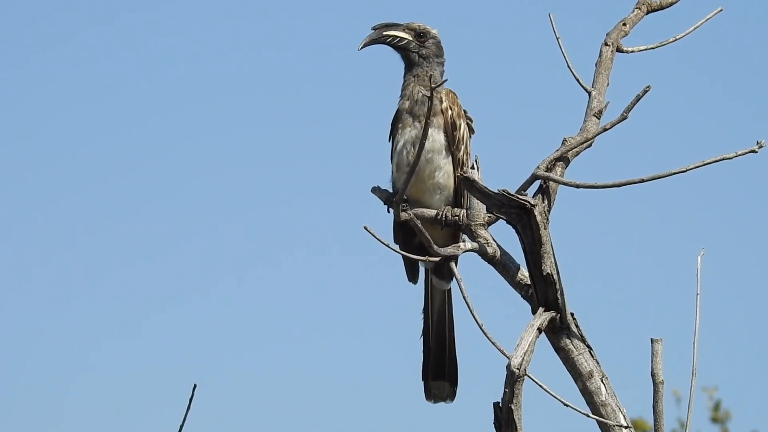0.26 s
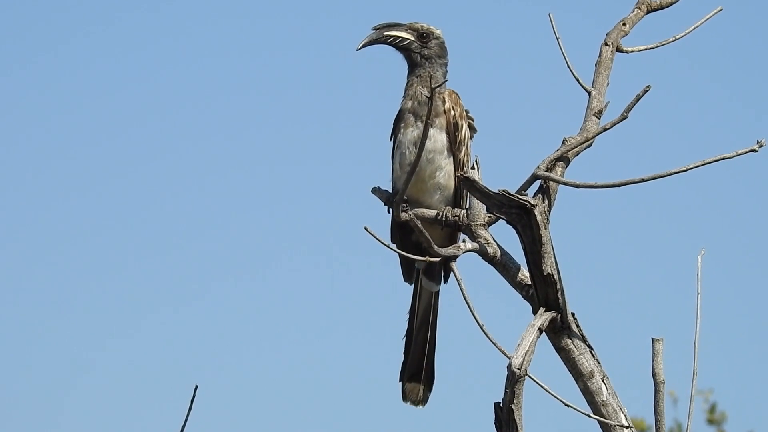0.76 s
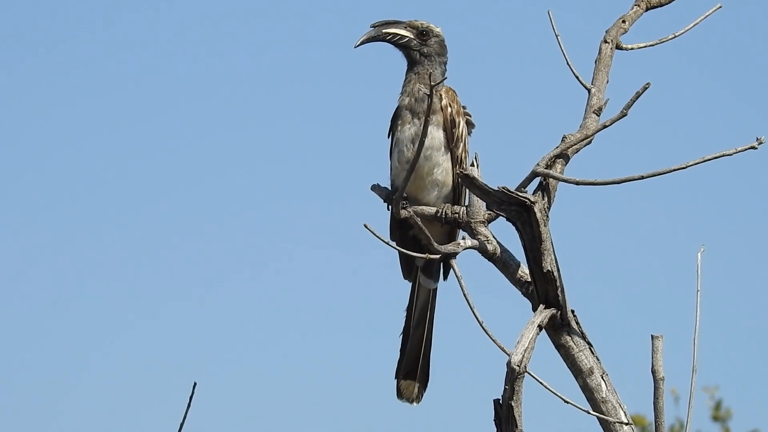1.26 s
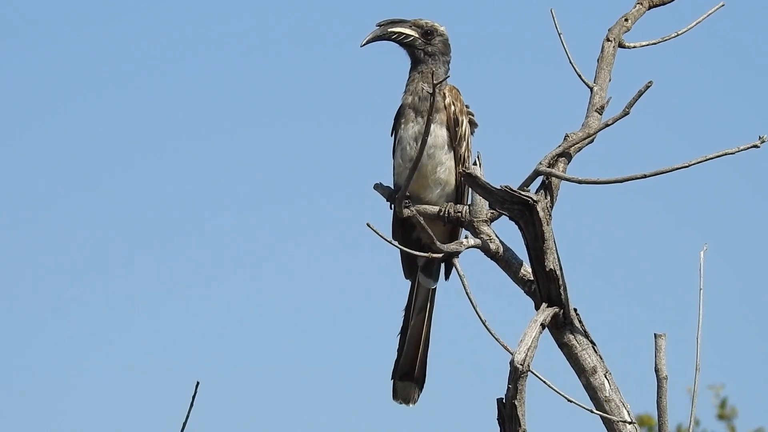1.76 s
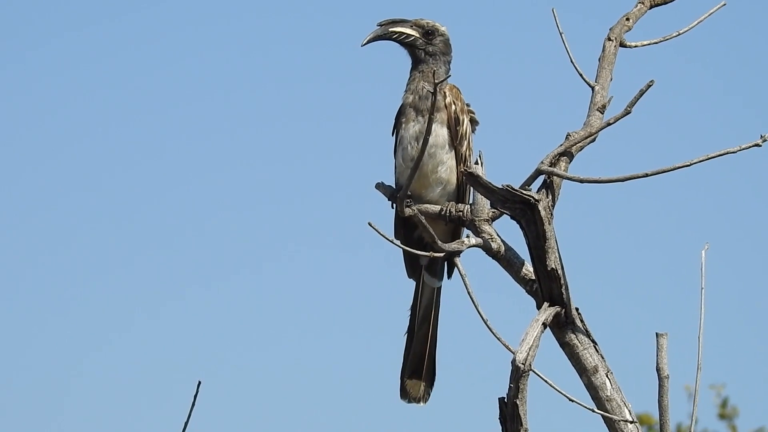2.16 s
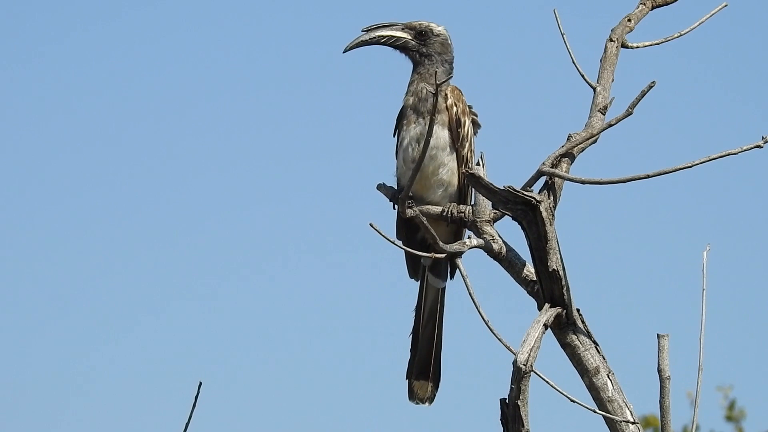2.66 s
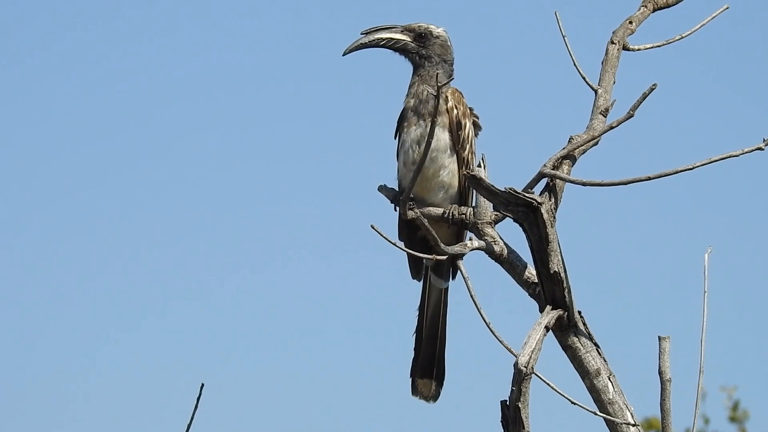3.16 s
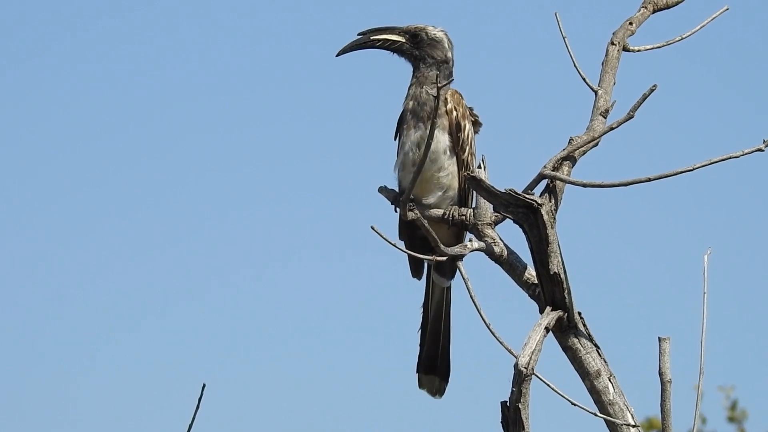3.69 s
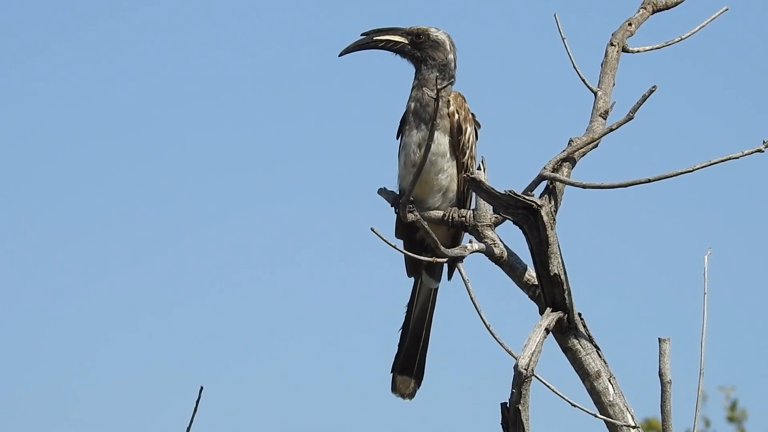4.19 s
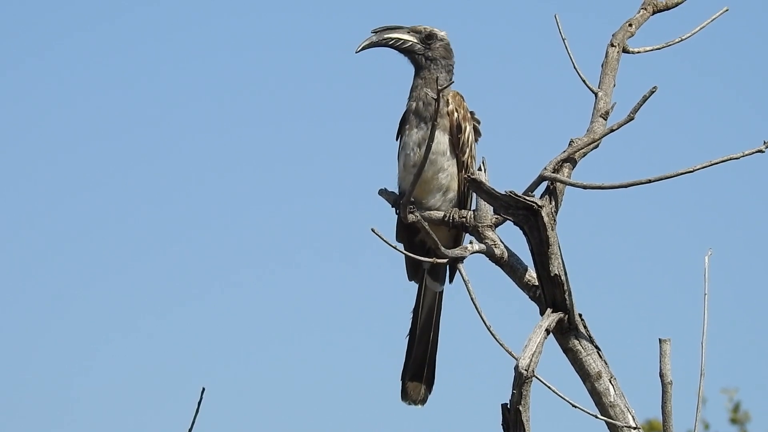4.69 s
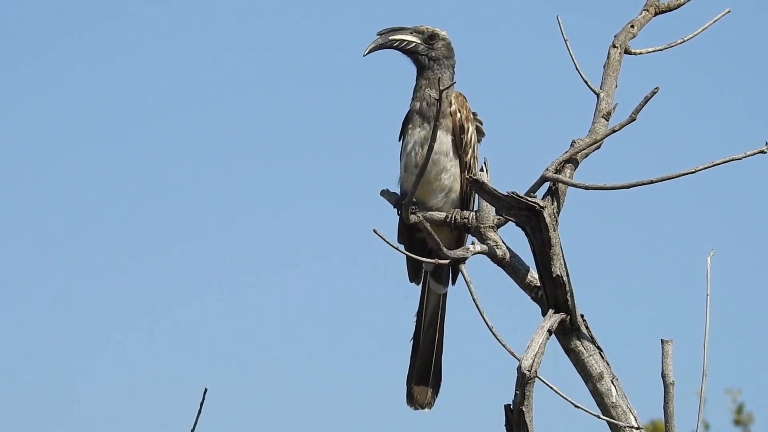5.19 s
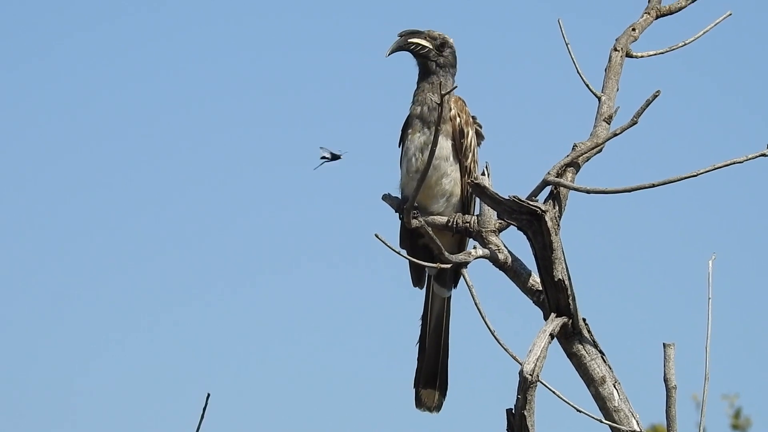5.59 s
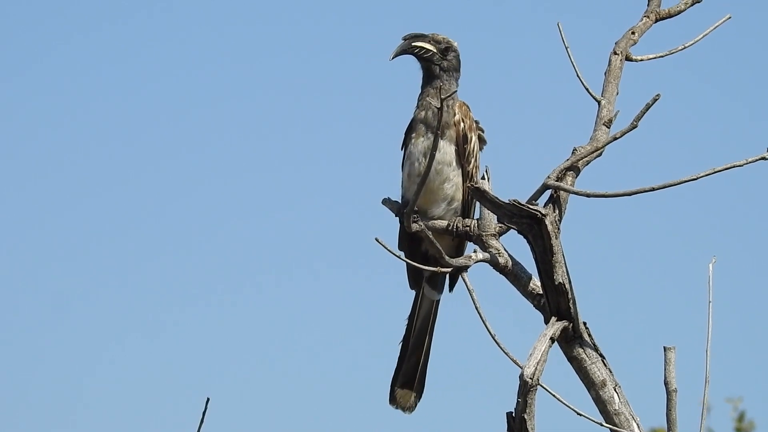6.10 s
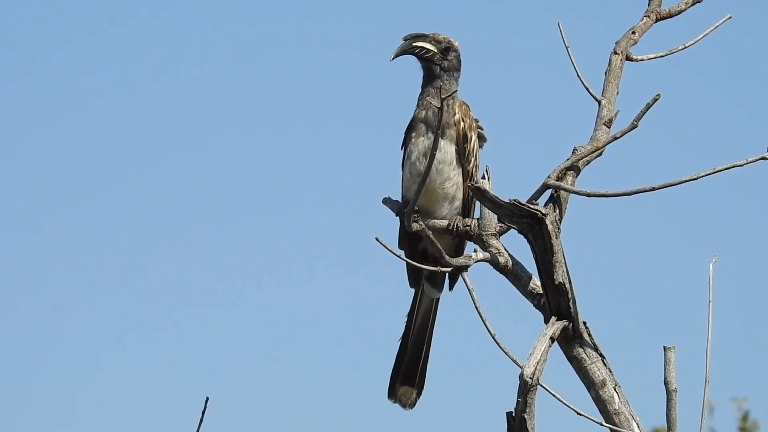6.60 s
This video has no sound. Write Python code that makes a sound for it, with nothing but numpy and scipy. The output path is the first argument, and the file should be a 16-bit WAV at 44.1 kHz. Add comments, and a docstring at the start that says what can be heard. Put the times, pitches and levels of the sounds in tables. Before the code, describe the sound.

Outdoors in quiet dry bush, one near bird pipes steadily. First come single nasal whistles with a quick upward break, the loudest and squeakiest near two seconds. Then slower pairs follow, a clear drooping whistle answered by a shorter one, repeating about every three quarters of a second to the end. A distant bird chirps early and again briefly late. Light breeze, barely audible air bumps and faint insects lie beneath; the left side is nearly silent.

```python
"""A hornbill pipes from a dead tree in open bush, each whistle breaking from a low register up to a high one.
The early calls are single and reedy, and a second bird whistles far off during the first second.
From about two seconds on, purer calls come in pairs, a falling pipe and then an answer; the far bird returns late.
Throughout, the bush gives faint echoes, a light breeze stirs the leaves and insects hold thin tones.
Voices are sines with overtones; leaves and puffs of air are shaped noise; all but a trace is on the right."""
import sys
import numpy as np
from scipy import signal
from scipy.fft import rfft, irfft, next_fast_len
from scipy.io import wavfile
from scipy.ndimage import uniform_filter1d, map_coordinates

SR = 44100
rng = np.random.default_rng(int(sys.argv[2]) if len(sys.argv) > 2 else 0)


def int16_out(signal):
    """Quantize to a 16-bit WAV file."""
    q = np.round(np.clip(np.atleast_2d(signal).T, -1, 1) * 32767)
    wavfile.write(sys.argv[1], SR, q.astype(np.int16))


N = 302085  # length in samples

# All levels in the tables are relative: later gains scale them.
# falling pipes of the near bird: start_s, low_length_s, high_length_s, overlap_s, low_pitch_hz,
# low_slide_share, high_pitch_hz, final_pitch_hz, low_level_db, high_level_db, fade_over_note_db,
# squeak_level_db, octave_level_db, upper_overtones_db
PIPES = [(-.04, 0.082, 0.033, 0.0011, 2141, -0.047, 2463, 2423, -34.5, -37, 9, -44, -18.5, -35),
         (.293, 0.092, 0.056, 0, 2168, -.06, 2450, 2401, -35, -40, 3, -47, -17, -31.5),
         (.665, 0.087, 0.06, 0.00062, 2167, -.06, 2448, 2404, -39, -40.5, 2.5, -54.5, -16, -27),
         (1.035, 0.086, 0.084, 0.007, 2164, -.052, 2450, 2369, -34, -36, 6, -51, -17, -26.5),
         (1.415, 0.078, 0.081, 0.0026, 2158, -.05, 2424, 2374, -29, -30.5, 5, -40, -17.5, -27),
         (1.812, 0.061, 0.11, 0.0028, 2155, -.056, 2428, 2322, -28, -29, 5, -33.5, -17, -31.5),
         (2.559, 0.044, 0.14, 0.002, 2119, -0.039, 2313, 2209, -29.5, -29, 5.5, -30.5, -19.5, -41),
         (3.318, 0.031, 0.16, 0.0026, 2014, -0.018, 2348, 2226, -41, -40, 5, -45.5, -25.5, -52),
         (4.072, .035, 0.18, .022, 2067, -0.031, 2375, 2234, -42, -36, 0, -45.5, -25, -53),
         (4.821, 0.005, .19, 0.0021, 2100, 0.0066, 2381, 2232, -43.5, -29.5, 13, -46.5, -26, -46.5),
         (5.564, 0.0024, .199, 0.0013, 2066, 0, 2373, 2236, -46.5, -38, 7.5, -52, -28, -50),
         (6.287, 0.0048, .19, 0.002, 2160, 0.0047, 2445, 2232, -46.5, -37, 2.5, -49.5, -23, -42.5)]
# answers, the second call of each pair: start_s, low_length_s, high_length_s, low_pitch_hz, high_pitch_hz,
# low_level_db, high_level_db, swell_over_note_db, octave_level_db, upper_overtones_db
ANSWERS = [(2.103, .008, .111, 1896, 2260, -48, -32, 0, -20, -36.5),
           (2.852, 0.031, 0.096, 1848, 2204, -36.5, -32, -1, -17.5, -39),
           (3.614, .035, 0.098, 1866, 2229, -42, -37.5, 0, -17.5, -41.5),
           (4.365, .038, 0.097, 1882, 2255, -40, -32.5, 4, -22.5, -40.5),
           (5.12, .028, 0.1, 1902, 2243, -42, -36.5, -0.5, -20, -41.5),
           (5.865, .039, 0.095, 1892, 2263, -45.5, -40.5, 0.5, -22.5, -45.5),
           (6.581, .042, .096, 1880, 2246, -43, -43, -6.5, -20.5, -51.5)]
# harsh cracks of the voice: time_s, pitch_hz, level_db
CRACKS = [(1.494, 2690, -42), (1.873, 2826, -45), (3.318, 3263, -50), (4.071, 3235, -47),
          (4.078, 2380, -43.5), (4.825, 3294, -44)]
# throat and beak colour of the overtones above the octave: frequency_hz, level_db
THROAT = [(5500, 10.5), (6700, 0), (7400, -6.5), (8100, -13), (8800, -8), (9700, -8), (10800, -20.5),
          (12200, -12.5), (13200, -9.5), (14400, -7.5), (15300, -21)]
# colour of the rasp in the voice: frequency_hz, level_db
RASP = [(300, -50), (1000, -28.0), (2000, -0.5), (3000, 4.5), (3700, -11.5), (4500, 0.0), (5600, -4.0),
        (7500, -23), (15000, -33.5)]
# colour of the breath in the voice: frequency_hz, level_db
AIR = [(200, -25), (600, -0.5), (1500, 9.0), (3000, 4.5), (4000, -6), (5600, 0.5), (8000, -13.5),
       (15000, -14.5)]
# whistles of the far bird: start_s, end_s, start_pitch_hz, end_pitch_hz, level_db
FAR_WHISTLES = [(0.168, 0.198, 2738, 2793, -42), (0.496, 0.516, 1570, 1810, -63),
                (0.521, 0.594, 2493, 3634, -48), (0.559, 0.574, 3001, 3245, -43.5),
                (0.721, 0.791, 2375, 2597, -47.5), (0.756, 0.778, 1752, 1935, -56.5),
                (0.783, 0.808, 2680, 2710, -42.5), (5.41, 5.454, 2880, 3016, -54),
                (5.429, 5.456, 3160, 3303, -46.5), (6.498, 6.576, 2990, 3430, -73)]
# strength of the breeze in the leaves: time_s, rustle_db, hiss_db
BREEZE = [(0.03, -85, -88), (0.14, -81.5, -86.5), (0.56, -89, -91), (1.02, -86, -92.5), (1.3, -81, -88.5),
          (1.81, -83, -89.5), (1.97, -80, -86.5), (2.31, -80, -85.5), (2.78, -76, -82),
          (3.35, -89.5, -94.5), (4.13, -88.5, -93.5), (4.36, -83, -90), (4.7, -81, -87), (5.1, -87, -92.5),
          (5.56, -83, -90.5), (6.07, -91.5, -97.5), (6.45, -86, -94.5), (6.85, -92, -98)]
# colour of the lower leaf noise: frequency_hz, level_db
RUSTLE = [(60, -41), (150, -23), (250, -17), (400, -8.5), (700, -3.5), (1300, 1), (1800, 2.5), (2800, 0),
          (3500, -2.5), (4500, -7), (8000, -13), (11000, -40)]
# colour of the higher leaf noise: frequency_hz, level_db
HISS = [(4000, -12.5), (7500, -4.5), (8700, 0.5), (9900, 9.5), (11200, 0.5), (13500, 5), (15700, 2)]
# puffs of air on the microphone: time_s (of the peak), length_s, level_db
PUFFS = [(.1, 0.07, -97), (.25, 0.11, -99), (0.879, .04, -88), (1.5, 0.12, -101), (1.893, .05, -87),
         (3.0, 0.18, -99), (3.635, .06, -91), (3.798, .12, -86.5), (4.9, 0.16, -96), (5.92, 0.28, -99)]
# colour of the puffs: frequency_hz, level_db
BUFFET = [(20, -17.0), (65, -3), (170, -1.0), (300, -8.5), (700, -36)]
# steady insect tones: pitch_hz, level_db
INSECTS = [(6550, -97), (7580, -96)]

# swell: rise through a note; arch: how far the middle stands out above the ends
LOW_SWELL_DB, LOW_ARCH_DB, PIPE_ARCH_DB = 1.5, 2, 3.5
LOW_UPPER_DB, LOW_FOLLOWS = -17, 0.51  # low overtones: base level, and share of the high ones' level added
SETTLE = 1.3  # time constants in a pipe's fall: the pitch drops fastest at first
OVERTONE_FADE_DB = 0.5  # a pipe grows purer as it runs out
ANSWER_SCOOP, ANSWER_LOW_SWELL_DB, ANSWER_LOW_ARCH_DB = 0.051, 7.5, 7.5  # scoop: share of the pitch
ANSWER_BEND, ANSWER_CREST = .04, 0.72  # depth of the pitch arch, and where in the note it peaks (shares)
ANSWER_ARCH_DB = 4
SAG, SAG_S, SAG_DULL_DB = .04, .026, 6  # final droop: share of the pitch, length, loss of overtones
LINGER = 0.24  # share of the low register that sounds on after the break
SQUEAK_HZ = 2400  # pitch at the start of an opening squeak
CRACK_RASP_DB = 3.5  # cracks are rougher than the opening squeaks
RUSTLE_DB, HISS_DB = 7.5, 10  # added to the breeze table
STILL_AIR_DB = -110  # buffeting between puffs
TOP_HZ = 15760  # nothing sounds at or above this


def hornbill():
    """The near bird: two registers and short squeaks, roughened by rasp and turbulent air."""
    low, high, squeaks, cracks = syrinx()
    # where both registers sound together they shake each other into sum tones and rasp
    clash = np.minimum(loudness(low), loudness(high))
    mixed = amp(-13.0) * low * high / (loudness(low + high) + 1e-4)
    sum_tones = filtered(mixed, lambda hz: (hz > 3700) & (hz < 5000))
    catches = amp(-3) * squeaks + amp(CRACK_RASP_DB) * cracks
    rasp = amp(-23.5) * (clash + loudness(catches)) * noise(RASP)
    # turbulent air rides on the tone in uneven spurts
    air = noise(AIR)
    spurts = unit(amp(4 * wobble(250, N)))
    voice = (low + high) * amp(0.75 * wobble(60, N)) + squeaks + cracks
    breath = amp(-45) * air * spurts * loudness(voice)
    return voice + sum_tones + rasp + breath


def syrinx():
    """The voice organ plays all calls as four tracks: low register, high register, squeaks, cracks."""
    low, high, squeaks, cracks = np.zeros((4, N))
    for (start, low_s, high_s, overlap_s, low_hz, slide, hz, final_hz, low_db, high_db,
         fade_db, squeak_db, octave_db, upper_db) in PIPES:
        falling = lambda u: hz + (final_hz - hz) * np.expm1(-SETTLE * u) / np.expm1(-SETTLE)
        low_upper_db = LOW_UPPER_DB + LOW_FOLLOWS * upper_db
        low_part = low_note(low_s, low_hz, slide, low_db, LOW_SWELL_DB, LOW_ARCH_DB,
                            octave_db - 0.8, low_upper_db, jitter=0.0022)
        high_part = high_note(high_s, falling, high_db, -fade_db, PIPE_ARCH_DB,
                              octave_db, upper_db, OVERTONE_FADE_DB)
        # sounds begin a few milliseconds early because they open softly
        add(squeaks, start - .003, squeak(SQUEAK_HZ, squeak_db))
        add(low, start - .001, low_part)
        add(high, start + low_s - overlap_s - .002, high_part)
    for (start, low_s, high_s, low_hz, hz, low_db, high_db,
         swell_db, octave_db, upper_db) in ANSWERS:
        arching = lambda u: hz * (1 - ANSWER_BEND * (u - ANSWER_CREST) ** 2)
        low_part = low_note(low_s + .002, low_hz, ANSWER_SCOOP, low_db, ANSWER_LOW_SWELL_DB,
                            ANSWER_LOW_ARCH_DB, octave_db=-28, upper_db=-44.5, jitter=0.0039)
        high_part = high_note(high_s, arching, high_db, swell_db, ANSWER_ARCH_DB, octave_db, upper_db)
        add(low, start - .001, low_part)
        add(high, start + low_s - .002, high_part)
    for start, hz, db in CRACKS:
        add(cracks, start - .003, squeak(hz, db))
    return low, high, squeaks, cracks


def low_note(length, hz, slide, level_db, swell_db, arch_db, octave_db, upper_db, jitter):
    """The low register slides and settles; it lingers faintly after the break, beating against the high one."""
    length = max(length, .004)
    t = np.arange(int((length + .029) * SR)) / SR
    u = np.clip(t / length, 0, 1)
    fading_db = -4 * (u - .5)  # overtones weaken towards the break
    pitch = hz * (1 - slide * np.cos(np.pi * u) / 2)
    tone = whistle(pitch, octave_db + fading_db, upper_db + fading_db, jitter, flutter_db=3.5, tilt_db=-8)
    main = gate(t, length - .001, rise=.0071, fall=.0043)
    linger = LINGER * gate(t, length, rise=0.014, fall=0.028)
    return tone * arch(u, level_db, swell_db, arch_db) * np.maximum(main, linger)


def high_note(length, pitch, level_db, rise_db, arch_db, octave_db, upper_db, purer_db=0):
    """The high register follows a pitch curve, then droops as the air runs out."""
    t = np.arange(int((length + .027) * SR)) / SR
    u = np.clip(t / max(length - .016, .01), 0, 1)
    droop = np.clip((t - length + SAG_S) / SAG_S, 0, 1) ** 2
    fading_db = -purer_db * (u - .5)
    tone = whistle(pitch(u) * (1 - SAG * droop), octave_db + fading_db,
                   upper_db + fading_db - SAG_DULL_DB * droop, jitter=0.0023, flutter_db=3, tilt_db=-1.0)
    level = arch(t / length, level_db, rise_db, arch_db)
    return tone * level * gate(t, length - .006, rise=.0062, fall=.016)


def squeak(hz, level_db):
    """The voice catches for a few milliseconds on a shaky, slightly falling pitch."""
    t = np.arange(int(0.015 * SR)) / SR
    tone = whistle(hz * (1 - 4 * t), octave_db=-20, upper_db=-38.5, jitter=0.044, flutter_db=0)
    return tone * amp(level_db) * gate(t, .0028, rise=0.0043, fall=0.0083)


def whistle(hz, octave_db, upper_db, jitter, flutter_db, tilt_db=0):
    """A slightly unsteady sine, its octave and weak overtones coloured by the throat."""
    n = len(hz)
    phase = 2 * np.pi * np.cumsum(hz * (1 + jitter * wobble(700, n))) / SR
    tone = np.sin(phase) + amp(octave_db + flutter_db * wobble(70, n)) * np.sin(2 * phase)
    for k in range(3, 8):
        level = upper_db + along(THROAT, k * hz) + tilt_db * (k > 4)  # tilt_db shifts the top overtones
        tone += amp(level + flutter_db * wobble(90, n)) * np.sin(k * phase)
    return np.sqrt(2) * tone


def far_bird():
    """The second bird: short, slurred whistles whose pitch glides and wavers."""
    voice = np.zeros(N)
    for start, end, from_hz, to_hz, db in FAR_WHISTLES:
        length = end - start
        t = np.arange(int((length + 0.017) * SR)) / SR
        pitch = glide([from_hz, to_hz], t, length)
        tone = whistle(pitch, octave_db=-48, upper_db=-48, jitter=.026, flutter_db=1)
        add(voice, start, tone * amp(db) * gate(t, length - .004, rise=0.0067, fall=0.016))
    return voice


def bush(x, t60, build_s, treble_db):
    """Echo scattered by trunks and branches: it builds up, dies by 60 dB in t60 seconds and can lose treble."""
    t = np.arange(int(.8 * SR)) / SR
    tail = rng.standard_normal(len(t)) * amp(-60 * t / t60) * (1 - np.exp(-t / build_s))
    wet = signal.fftconvolve(x, tail / np.linalg.norm(tail))[:N]
    return filtered(wet, lambda hz: amp(along([(2300, 0.013), (12000, treble_db)], hz)))


def leaves():
    """Leaves in the breeze: two bands of noise that swell and stir together."""
    rustle_db, hiss_db = curves(BREEZE)
    stir_db = 1.3 * wobble(8.2, N)
    rustle = amp(rustle_db + RUSTLE_DB + stir_db) * noise(RUSTLE)
    hiss = amp(hiss_db + HISS_DB + stir_db) * noise(HISS)
    return rustle + hiss


def buffeting():
    """Puffs of air push on the microphone as soft bumps of low noise."""
    t = np.arange(N) / SR
    puffs = sum(amp(db) * np.exp(-(2 * (t - s) / length) ** 2) for s, length, db in PUFFS)
    push = amp(STILL_AIR_DB) + puffs
    return push * amp(2.5 * wobble(29, N)) * noise(BUFFET)


def insects():
    """Thin sines whose pitch and level waver a little."""
    tones = np.zeros(N)
    for hz, db in INSECTS:
        level = amp(db + 0.68 * wobble(3, N))
        phase = 2 * np.pi * np.cumsum(hz + 25 * wobble(110, N)) / SR
        tones += level * np.sin(phase)
    return tones


def amp(db):
    """Decibels to gain."""
    return 10 ** (np.asarray(db) / 20)


def unit(x):
    """Scale to an rms (average strength) of 1."""
    return x / np.sqrt(np.mean(x ** 2) + 1e-20)


def loudness(x):
    """Running rms over a few milliseconds."""
    return np.sqrt(np.abs(uniform_filter1d(x ** 2, size=200)))


def along(points, hz):
    """Read a curve of (frequency, value) points on a log frequency axis."""
    f, v = np.transpose(points)
    return np.interp(np.log(hz + 1), np.log(f + 1), v)


def curves(rows):
    """One value per sample for each column after the time."""
    s, *cols = np.transpose(rows)
    return [np.interp(np.arange(N) / SR, s, c) for c in cols]


def wobble(rate, n):
    """A smooth random curve of n samples with rate random points a second."""
    points = rng.standard_normal(int(n * rate / SR) + 4)
    return map_coordinates(points, [np.arange(n) * rate / SR])


def glide(values, t, length):
    """A smooth curve through values spread evenly over a length of time."""
    place = np.clip(t / length, 0, 1) * (len(values) - 1)
    return map_coordinates(np.asarray(values, float), [place], order=2, mode="nearest")


def gate(t, length, rise, fall):
    """Soft opening at 0 and soft closing after length; all in seconds."""
    opening = np.clip(t / rise, 0, 1)
    closing = np.clip((length + fall - t) / fall, 0, 1)
    return np.sin(np.pi / 2 * opening * closing) ** 2


def arch(u, level_db, rise_db, arch_db):
    """Gain through a note (u from 0 to 1): a slope and a hump about a middling level."""
    u = np.clip(u, 0, 1)
    return amp(level_db + rise_db * (u - .5) + arch_db * (3.6 * u * (1 - u) - 2 / 3))


def filtered(x, response):
    """Scale each frequency of x by response(hz)."""
    m = next_fast_len(N + SR // 2)
    return irfft(rfft(x, m) * response(np.fft.rfftfreq(m, 1 / SR)), m)[:N]


def noise(spectrum):
    """Coloured noise of rms 1."""
    return unit(filtered(rng.standard_normal(N), lambda hz: amp(along(spectrum, hz))))


def add(track, start, sound):
    """Mix a sound in at a time in seconds; it may already be under way at 0."""
    i = round(start * SR)
    sound = sound[max(-i, 0):]
    i = max(i, 0)
    track[i:i + len(sound)] += sound[:max(N - i, 0)]


def scene():
    """The near bird is almost dry, the far one has strong echo; one microphone feeds the right channel."""
    near, far = hornbill(), far_bird()
    mono = near + amp(-15.5) * bush(near, t60=0.4, build_s=0.0092, treble_db=0)
    mono += amp(-3.0) * far
    mono += amp(-5.5) * bush(far, t60=.25, build_s=0.0025, treble_db=-6.0)
    mono += amp(-13) * bush(far, t60=.8, build_s=0.041, treble_db=-9.5)
    mono += leaves() + buffeting() + insects()
    return np.array([np.zeros(N), 2 * mono])


def record(dry):
    """Cut everything from TOP_HZ up; the unused left channel holds only a trace of hiss."""
    idle = amp(-97) * rng.standard_normal(N)
    return np.array([filtered(channel, lambda hz: hz < TOP_HZ) for channel in (dry[0] + idle, dry[1])])


dry = scene()
out = record(dry)
int16_out(out)
```